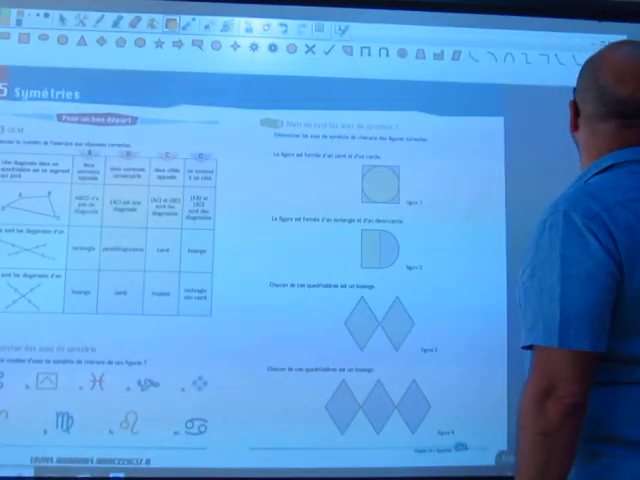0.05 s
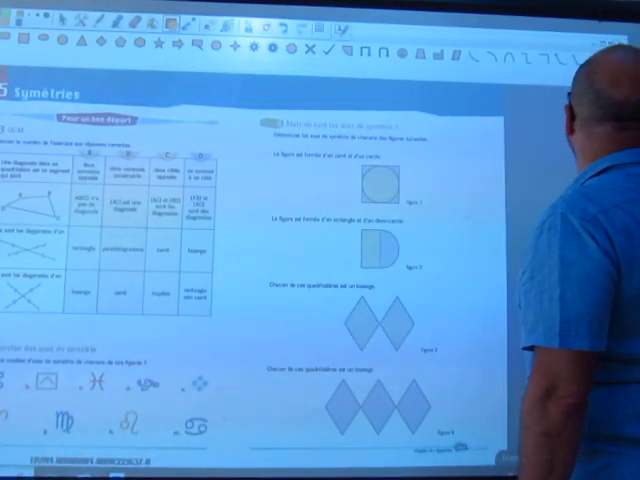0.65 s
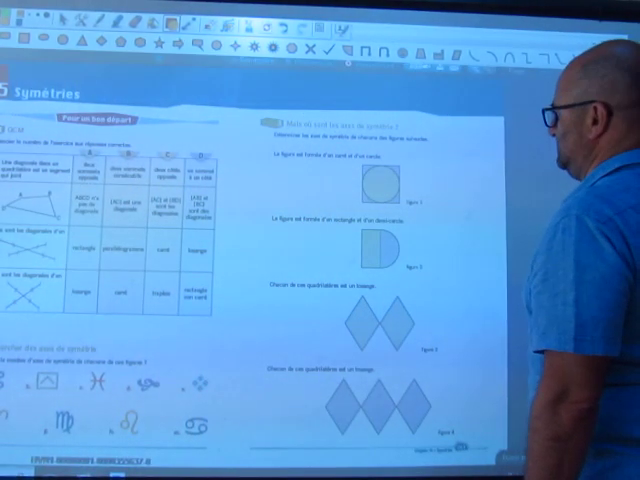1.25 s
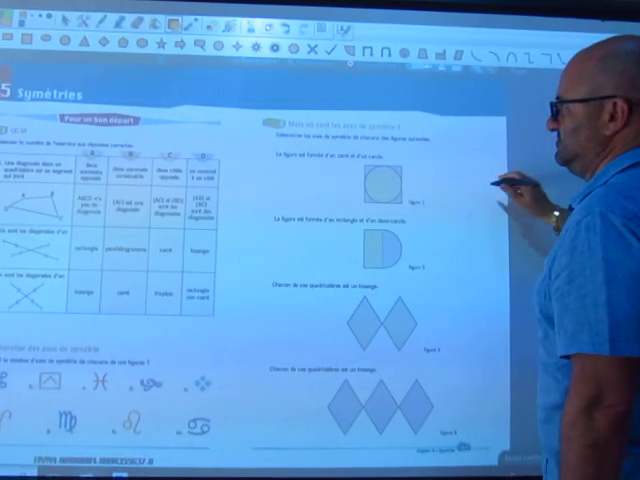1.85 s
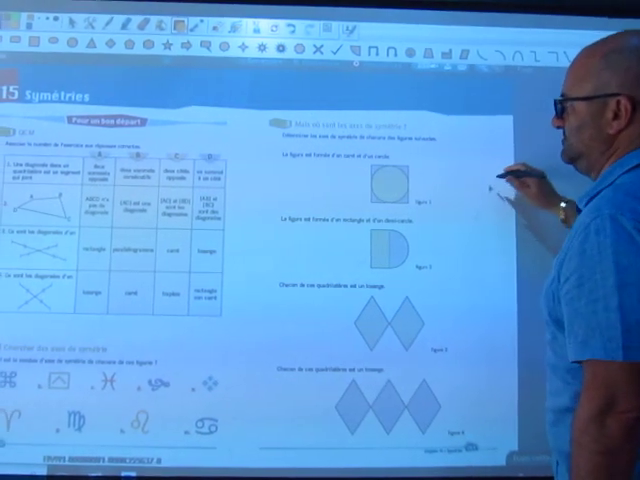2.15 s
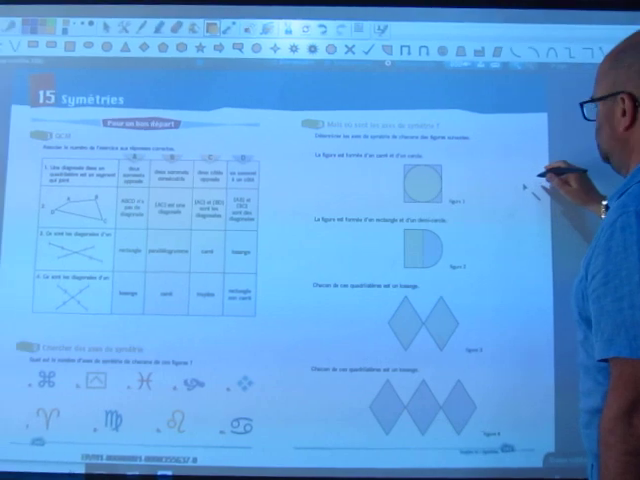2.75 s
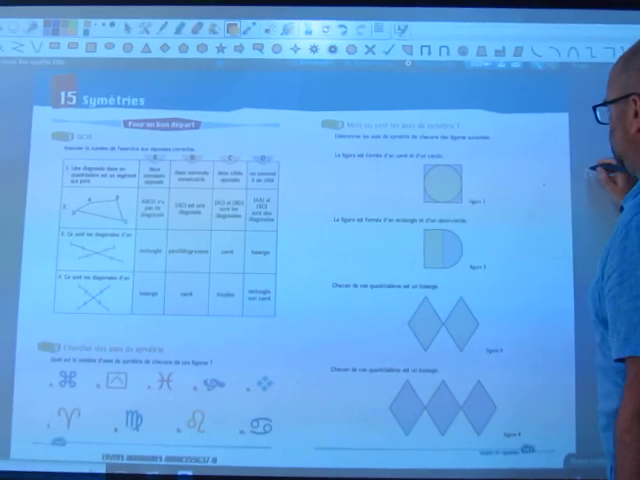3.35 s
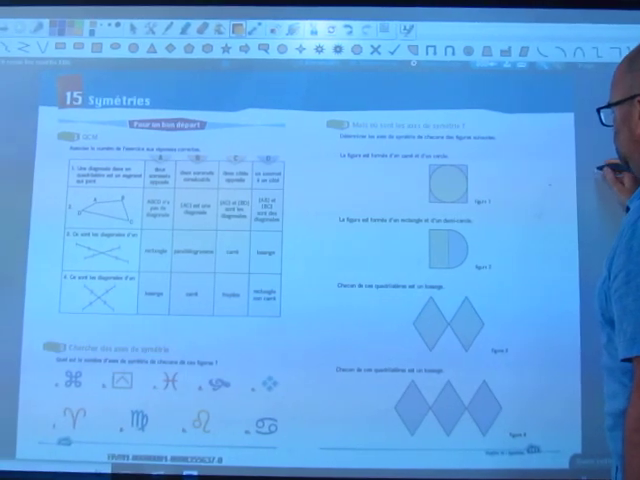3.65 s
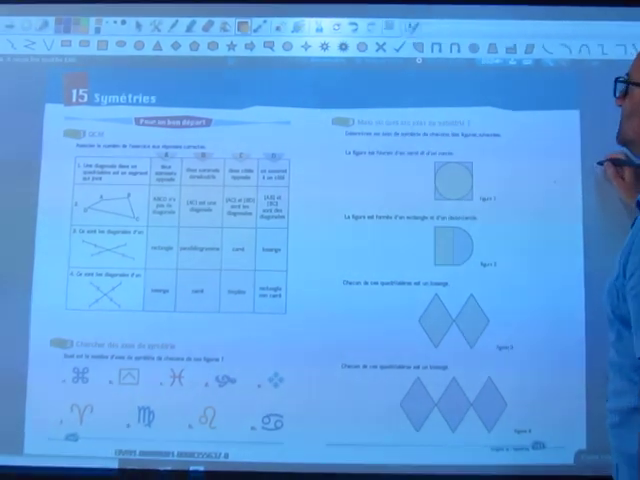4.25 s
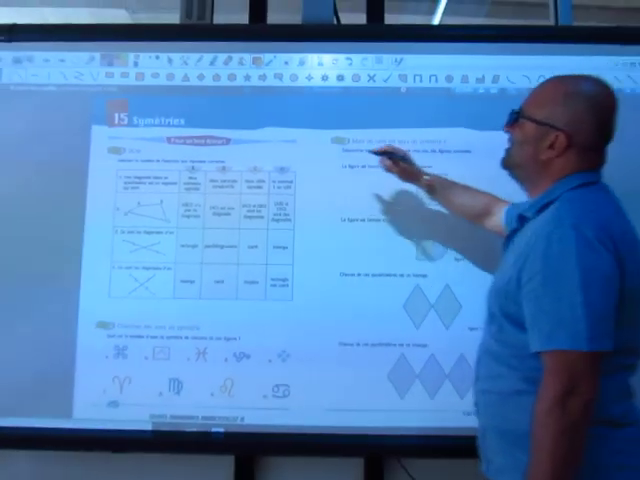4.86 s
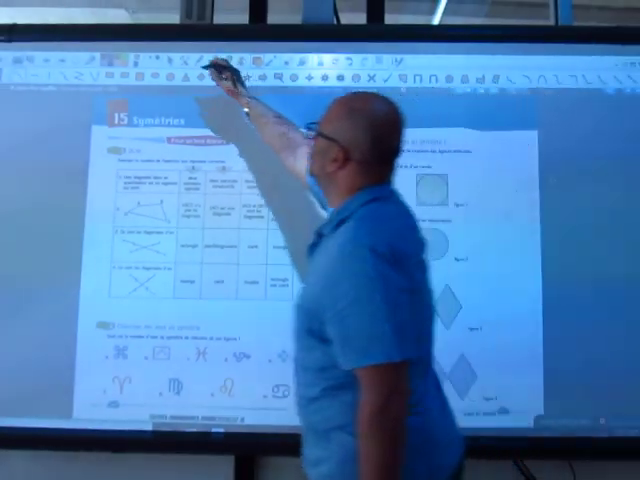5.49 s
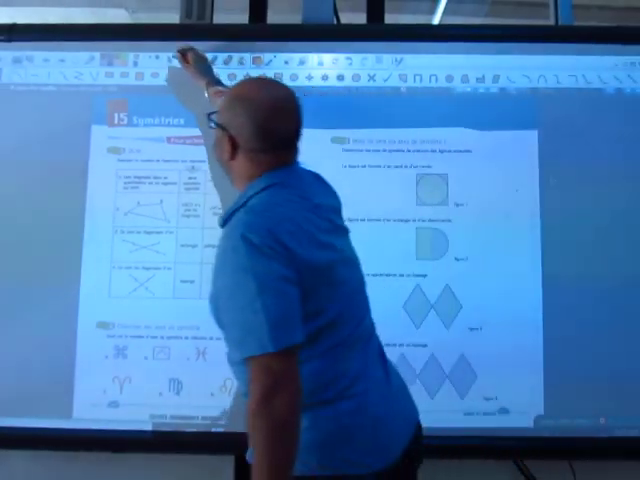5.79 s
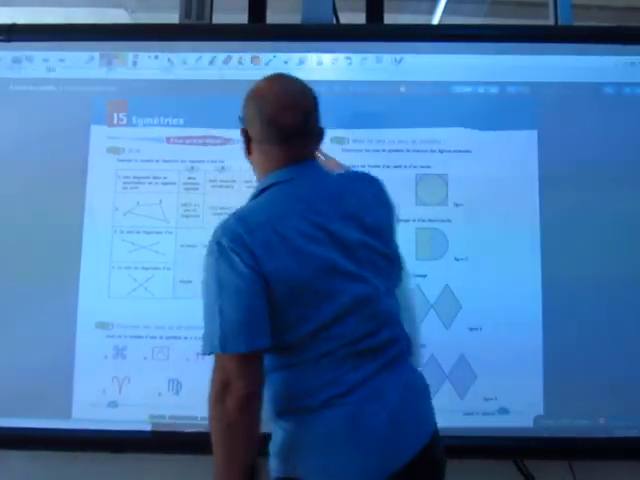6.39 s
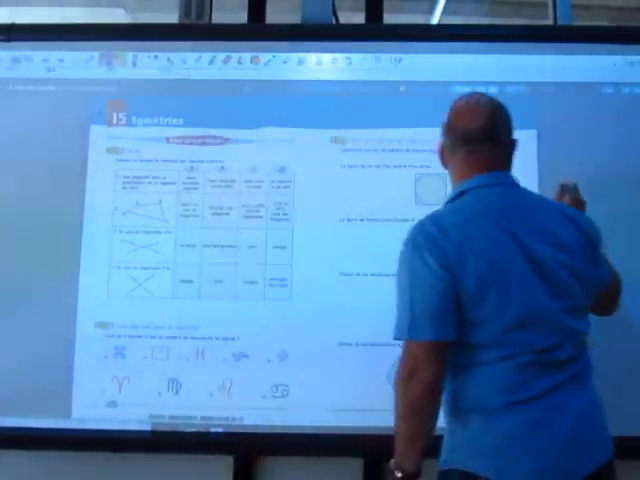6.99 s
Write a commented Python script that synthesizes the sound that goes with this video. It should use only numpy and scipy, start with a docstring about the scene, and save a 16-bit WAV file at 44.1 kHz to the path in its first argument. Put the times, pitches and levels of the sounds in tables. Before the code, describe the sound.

Four ringing pen taps on a whiteboard screen over ventilation hum, with camera handling ticks, a loud clack and heavy steps partway through.

```python
"""A plastic stylus taps four times on an interactive whiteboard in a bare classroom.
Each tap clicks, makes the pen ring and thumps the panel, and the room echoes it.
A hand on the camera makes small ticks, rustles and one loud clack that briefly turns its volume down.
The teacher takes a few heavy steps along the board. Behind it all are ventilation noise,
a low hum and a faint bird outside."""
import sys
import numpy as np
from scipy import signal
from scipy.fft import rfft, irfft, next_fast_len
from scipy.io import wavfile
from scipy.ndimage import map_coordinates

SR = 44100
rng = np.random.default_rng(int(sys.argv[2]) if len(sys.argv) > 2 else 0)


def output_pcm(signal):
    """Save a mono or channel-first signal as 16-bit PCM at the path in sys.argv[1].

    Samples are clipped to [-1, 1] before scaling.
    """
    pcm = np.clip(np.atleast_2d(signal).T, -1, 1) * 32767
    wavfile.write(sys.argv[1], SR, np.round(pcm).astype(np.int16))


N = 314433
T = np.arange(SR) / SR  # one second of time, for a single sound
HZ = np.fft.rfftfreq(SR, 1 / SR)  # the frequencies in that second

# Levels in the tables are relative: the functions add their own gain.
# Stylus taps. Each row: start in seconds, click in dB, pen pitch in Hz, grip from 0 to 1,
# a dip in the tone in Hz, thump in dB, crack over the click in dB, left over right in dB.
TAPS = [(0.7402, -17, 3870, 0, 4780, -32, -26, -2.5), (2.0160, -13.5, 4500, 0.04, 3700, -19.5, -6, 0),
        (3.2118, -14, 4340, 0.15, 3530, -22, -5, -1.5), (6.0217, -12.5, 3800, 1, 2880, -18.5, -8, 2)]
# How the pen rings. Each row: multiple of its pitch, level in dB, multiple of its ring width.
PEN_MODES = [(1, -4.5, 1.15), (1.28, -16.5, 1.3), (1.95, -20, 4.3), (2.6, -14.5, 11)]
# Ringing tones. Each row: pitch in Hz, level in dB, seconds to fade by 60 dB (called t60).
PANEL_MODES = [(114, -47, 0.095), (153, 3.5, 0.17), (190.1, -8.5, 0.37), (219.4, -11, 0.28)]
SHELL_MODES = [(400, 3, 0.059), (573, 15.5, 0.021), (770, 10, 0.024), (950, 4, 0.028)]
# Camera ticks. Each row: start in seconds, level in dB, extra treble in dB.
TICKS = [(3.5084, -24.5, -22), (3.5677, -20, -21), (3.6142, -27.5, -29), (3.7847, -27.5, -16),
         (4.0108, -25, -28), (4.0405, -32, -2), (4.1147, -23.5, -26), (4.266, -21.5, -12),
         (4.283, -17, -10)]
# The camera mount's two blows. Each row: start in seconds, level in dB, t60 in seconds,
# likeness of left and right (1 means the same), echo in dB, brightness in dB.
CLACKS = [(4.5382, 0, 0.11, 0.48, -4.5, 0), (4.5873, -1.5, 0.021, -0.35, -24, -6)]
# A soft fading hiss at the start, two faint bright ticks, then light brushes of hand and cloth.
# Each row: start in seconds, level in dB, length in seconds, brightness in dB.
SMALL_NOISES = [(0, -40, 0.042, -8), (0.867, -43, .006, 18), (1.245, -53, .006, 17),
                (2.862, -49.5, .03, -3), (3.78, -42.5, 0.015, 5), (3.971, -42, 0.026, -11),
                (4.325, -44.5, 0.19, 10), (5.393, -39.5, 0.056, 5.5), (6.843, -38.5, 0.067, -9)]
# Footsteps. Each row: start in seconds, weight in dB, scuff in dB, heel hardness from 0 to 1.
STEPS = [(3.52, -35, -58, 0.35), (4.472, -29, -30, 0.28), (4.875, -34, -46, 0), (4.948, -24, -27.5, 0.26),
         (5.125, -19.5, -28.5, 0.07), (5.393, -25, -35.5, 0.66), (5.486, -17.5, -22, 0.97),
         (6.627, -14.5, -24.5, 0.37), (6.80, -29.5, -34, 0)]
# The tone of a shoe's scuff. Each row: multiple of its upper edge frequency, level in dB.
SCUFF_TONE = [(.06, -50), (.18, -22), (.45, 4), (1, -2.5), (1.6, -12), (3, -19.5), (8, -32.5), (30, -58)]
# The tone of each sound. Each row: frequency in Hz, level in dB.
CLICK_TONE = [(100, 0), (400, -6.5), (1300, -3), (2100, -6), (3200, 2), (6000, -2.5), (8500, -8),
              (10200, -17), (11700, -16.5), (16000, -10.5)]  # pen tip on the panel
CRACK_TONE = [(3000, -45), (8000, 5), (11500, 1), (16000, -7)]  # the tip's first hard contact
TICK_TONE = [(150, 1), (500, 3), (1100, 3), (2000, 4), (3500, -5.5), (6000, -4), (16000, -22)]
CLACK_TONE = [(40, -67), (120, -43), (250, 1), (400, -9), (630, 1.5), (1000, -1), (1500, -2), (2500, -3.5),
              (5000, -6), (7500, -12), (11000, -21.5), (16000, -28)]
RUSTLE_TONE = [(500, 14), (1500, 13), (3000, 7), (6000, 5.5), (8500, 1), (12000, -3.5), (16000, -8)]
THUD_TONE = [(25, -75), (45, -57), (70, -18), (95, 2.5), (112, 4), (140, -3.5), (190, 2.5), (245, -3),
             (290, 0.5), (380, -11.5), (460, -14.5), (830, -29), (1500, -71), (3000, -90)]  # floor under a shoe
AIR_TONE = [(12, -46), (20, -19), (48, -4.5), (70, -2), (101, -1.5), (123, -8.5), (150, -4.5), (216, -9),
            (270, -8), (574, -14), (678, -15), (897, -16), (2670, -27), (4420, -31), (16000, -45.5)]
# The bird's three notes. Each row: seconds into the phrase, pitch in Hz, level in dB.
BIRD_NOTES = [(0, 4870, 0), (.095, 4520, 2), (.157, 5630, 1)]
# How the ventilation rises and falls. Each row: time in seconds, level in dB.
AIR_LEVELS = [(0, 2.5), (1, 1.5), (3.6, 1), (5.5, 3)]
# Stereo width. Each row: frequency in Hz, likeness of left and right.
ROOM_LIKENESS = [(25, 0), (70, 0), (200, 0.58), (350, 0), (600, 0.18), (1200, 0.087), (16000, 0.053)]  # sound from all around
FLOOR_LIKENESS = [(300, 1), (600, 0.41), (1500, 0.09)]  # sound straight from the floor
# How long the room echoes. Each row: frequency in Hz, t60 in seconds.
ROOM_FADE = [(100, 1), (300, 0.89), (1000, 0.8), (4000, 0.7), (6500, 0.56), (9000, 0.54), (15000, 0.24)]


def stylus(click_db=18, room_db=4, wall_delay_s=0.0048):
    """The tip clicks, the panel thumps and the pen rings at each tap's own pitch, duller if held tight."""
    out = np.zeros((2, N))
    for s, db, pen_hz, grip, dip_hz, thump_db, crack_db, pan_db in TAPS:
        width_hz, pen_db = 187 + 900 * grip, 22.5 - 13 * grip  # a tight grip widens and weakens the ring
        pen_power = 0
        for ratio, level, widen in PEN_MODES:
            off_pitch = 2 * (HZ - ratio * pen_hz) / (widen * width_hz)
            pen_power += amp(pen_db + level) ** 2 / (1 + off_pitch ** 2) ** 1.55
        dip_db = -13 / (1 + ((HZ - dip_hz) / 150) ** 2)
        click = amp(db + click_db) * impact(along(CLICK_TONE, HZ) + 10 * np.log10(1 + pen_power) + dip_db)
        crack = amp(db + click_db + crack_db) * scatter(impact(along(CRACK_TONE, HZ)), 0.018, 0.19)
        thump = amp(thump_db) * ringing(PANEL_MODES)
        # the panel smears the click; a near wall and the furniture send it back first
        direct = crack + amp(-5) * click + amp(-4) * scatter(click, t60=0.1, likeness=1)
        wall = amp(-8.5) * crack + amp(-1) * scatter(click, t60=0.018, likeness=0.54)
        furniture = amp(-3) * scatter(click, t60=0.053, likeness=0.8)
        pan = amp([[pan_db / 2], [-pan_db / 2]])
        add(out, s, pan * direct + thump + amp(room_db) * room(click) + amp(-6.5) * room(thump))
        add(out, s + wall_delay_s, pan * wall + furniture)
    return out


def clack(clack_db=21, snap_db=10, judder_db=-13, judder_t60=1.0):
    """The camera mount snaps loose, shakes for an instant and hits its stop with a duller blow."""
    out = np.zeros((2, N))
    for s, db, t60, likeness, room_db, bright_db in CLACKS:
        tilt_db = along([(1500, 0), (6000, bright_db)], HZ)
        blow = amp(db + clack_db) * impact(along(CLACK_TONE, HZ) + tilt_db)
        add(out, s, scatter(blow, t60, likeness) + amp(room_db) * room(blow))
    start, stop = CLACKS[0][0], CLACKS[1][0]
    snap = impact(along([(1000, -23), (8000, 8), (15000, -5)], HZ))
    add(out, start, amp(snap_db) * scatter(snap, t60=0.004, likeness=0.58))
    judder = amp(judder_db - 60 * T / judder_t60) * noise(CLACK_TONE, [(1, 0.23)])
    add(out, start, judder * (T < stop - start))
    return out


def steps(thud_t60=0.41, scuff_t60=0.3, grit_t60=0.079, sole_delay_s=0.018, room_db=-6):
    """The heel thuds and scuffs, then the sole comes down and booms in the floor."""
    out = np.zeros((2, N))
    for s, weight_db, scuff_db, hardness in STEPS:
        rise_s = 0.017 * (0.00033 / 0.017) ** hardness  # a harder heel is quicker
        edge_hz = 740 * (1410 / 740) ** (hardness ** 6.1)  # only a really hard heel is brighter
        scuff_tone = [(ratio * edge_hz, db) for ratio, db in SCUFF_TONE]
        thud = amp(weight_db - 4) * swell(rise_s, thud_t60) * noise(THUD_TONE, FLOOR_LIKENESS)
        scuff = amp(scuff_db) * swell(rise_s, scuff_t60) * noise(scuff_tone, FLOOR_LIKENESS)
        grit = amp(weight_db - 26) * swell(rise_s, grit_t60) * noise(RUSTLE_TONE, FLOOR_LIKENESS)
        sole = amp(weight_db - 0.5) * swell(0.0054, thud_t60) * noise(THUD_TONE, FLOOR_LIKENESS)
        for start, contact in (s, thud + scuff + grit), (s + sole_delay_s, sole):
            add(out, start, contact + amp(room_db) * room(contact))
    return out


def ticks(tick_db=14, room_db=-13):
    """The camera body gives small dry ticks under the hand."""
    out = np.zeros((2, N))
    for s, db, treble_db in TICKS:
        tilt_db = along([(700, -4), (2000, 0), (4000, 0), (8000, treble_db + 10)], HZ)
        pulse = amp(db + tick_db) * impact(along(TICK_TONE, HZ) + tilt_db)
        tick = scatter(pulse, t60=0.028, likeness=0.086)
        add(out, s, tick + amp(room_db) * room(tick))
    return out


def knock(start_s=4.304, db=-26):
    """A fingertip bumps the hollow camera shell."""
    out = np.zeros((2, N))
    add(out, start_s, amp(db) * ringing(SHELL_MODES))
    return out


def small_noises(grain_db=2):
    """Bursts of grainy noise make a soft fading hiss, two faint ticks and brushes of hand and cloth."""
    out = np.zeros((2, N))
    for s, db, length_s, bright_db in SMALL_NOISES:
        progress = T / length_s
        rise = 1 - np.exp(-progress / 0.05)
        fade = amp(-60 * np.maximum(progress - 1, 0) / 9.3)
        tone = [(hz, level + along([(2500, 0), (9000, bright_db)], hz)) for hz, level in RUSTLE_TONE]
        flicker = amp(db + grain_db * wobble(157.5)[:SR])
        add(out, s, flicker * rise * fade * noise(tone, [(1, 0.15)]))
    return out


def bird(starts_s=(0.24, 3.655, 4.028), bird_db=-49.5, note_s=0.046, sweep=0.0495, waver=0.0274):
    """A small bird outside repeats three short wavering notes, heard mostly through the room's echo."""
    out = np.zeros((2, N))
    progress = np.minimum(T / note_s, 1)
    for start in starts_s:
        for s, hz, db in BIRD_NOTES:
            pitch = hz * (1 + sweep * (progress - .5) + waver * wobble(186)[:SR])
            note = amp(bird_db + db) * np.sin(np.pi * progress) * sine(pitch)
            add(out, start + s, amp(-5) * note + amp(-3) * room(note))
    return out


def ventilation(air_db=-41.5):
    """Moving air makes a soft rush whose level drifts a little."""
    drift_db = np.interp(np.arange(N) / SR, *np.transpose(AIR_LEVELS))
    return amp(air_db + drift_db + 0.14 * wobble(2.82)) * noise(AIR_TONE, ROOM_LIKENESS, size=N)


def hum(rest_hz=99.5, rest_db=-50, sag_hz=7, swell_db=12.5):
    """A low hum wavers and swells once, dropping in pitch as it grows louder."""
    height = np.interp(np.arange(N) / SR, [4.5, 5.284, 6.434, 7.904], [0, 1, 1, 0])
    pitch = rest_hz - sag_hz * height + 1.62 * wobble(13)
    level_db = rest_db + swell_db * height + 3 * wobble(6.7)
    return amp(level_db) * np.sqrt(2) * sine(pitch)


def room(sound, build_s=0.0068):
    """The bare classroom echoes a sound; the treble dies first."""
    hz, t, bands = signal.stft(noise([(1, 0)], ROOM_LIKENESS), SR, nperseg=256)
    fade = amp(-60 * t / along(ROOM_FADE, hz)[:, None])
    tail = signal.istft(bands * fade, SR, nperseg=256)[1][:, :SR]
    echo = unit(tail * (1 - np.exp(-T / build_s))) / np.sqrt(SR)
    return convolve(np.atleast_2d(sound)[0], echo)


def ringing(modes, rise_s=0.0025):
    """A struck object rings with a few fading tones."""
    tones = sum(amp(db - 60 * T / t60) * np.sin(2 * np.pi * hz * T) for hz, db, t60 in modes)
    return (1 - np.exp(-T / rise_s)) * tones


def impact(tone_db):
    """The shortest sudden pulse with this tone, of energy 1."""
    cepstrum = irfft(np.log(amp(np.maximum(tone_db, -100))), SR)
    pulse = irfft(np.exp(rfft(2 * cepstrum[:SR // 2], SR)), SR)  # packs the energy at the start
    return pulse / np.linalg.norm(pulse)


def scatter(sound, t60, likeness):
    """Smear a sound into a dense cluster of fading copies."""
    cluster = noise([(1, 0)], [(1, likeness)]) * amp(-60 * T / t60)
    return convolve(sound, unit(cluster) / np.sqrt(SR))


def noise(tone, likeness, size=SR):
    """Stereo noise shaped by (Hz, dB) points and (Hz, left-right likeness) points."""
    padded = next_fast_len(size)
    hz = np.fft.rfftfreq(padded, 1 / SR)
    angle = np.arccos(np.clip(along(likeness, hz), -1, 1)) / 2
    spectrum = rfft(rng.standard_normal((2, padded))) * amp(along(tone, hz))
    mid, side = irfft(spectrum * [np.cos(angle), np.sin(angle)], padded)[:, :size]
    return unit(np.array([mid + side, mid - side]))


def swell(rise_s, t60):
    """A loudness curve that rises to 1 and dies away."""
    shape = (1 - np.exp(-T / rise_s)) * amp(-60 * T / t60)
    return shape / shape.max()


def wobble(rate):
    """A smooth random curve through this many points a second."""
    return map_coordinates(rng.standard_normal(int(N * rate / SR) + 4), [np.arange(N) * rate / SR])


def sine(pitch_hz):
    """A pure tone that follows a changing pitch."""
    return np.sin(2 * np.pi * np.cumsum(pitch_hz) / SR)


def convolve(sound, echoes):
    """Give a one-second sound a pattern of echoes."""
    return signal.fftconvolve(np.atleast_2d(sound), np.atleast_2d(echoes), axes=1)[:, :SR]


def along(points, hz):
    """Read between (Hz, value) points on a log frequency scale."""
    frequencies, values = np.transpose(points)
    return np.interp(np.log(hz + 1), np.log(frequencies + 1), values)


def amp(db):
    """Turn decibels into a gain."""
    return 10 ** (np.asarray(db) / 20)


def unit(sound):
    """Scale to an average power of 1."""
    return sound / np.sqrt(np.mean(sound ** 2) + 1e-20)


def add(track, start_s, sound):
    """Mix a sound into the track at its start time."""
    part = track[:, round(start_s * SR):][:, :sound.shape[-1]]
    part += sound[..., :part.shape[1]]


def scene():
    """Mix all the sources, a little louder on the right."""
    close_by = ticks() + knock() + clack() + small_noises()
    return (stylus() + close_by + steps() + bird() + ventilation() + hum()) * amp([[-.9], [.9]])


def record(dry, ceiling=0.88, release_s=0.24, top_hz=15950):
    """The camera turns down when overloaded, recovers slowly, clips peaks and cuts the highest treble."""
    overload = np.log(np.maximum(np.abs(dry).max(axis=0) / ceiling, 1))
    recovery = np.arange(N) / SR / release_s
    turn_down = np.maximum.accumulate(overload * np.exp(recovery)) * np.exp(-recovery)
    gain = np.exp(-signal.lfilter([.02], [1, -.98], turn_down))  # smoothed over about 1 ms
    clipped = np.clip(dry * gain, -1, 1)
    padded = next_fast_len(N + SR // 2)
    passband = np.fft.rfftfreq(padded, 1 / SR) < top_hz
    return irfft(rfft(clipped, padded) * passband, padded)[:, :N]


dry = scene()
out = record(dry)
output_pcm(out)
```